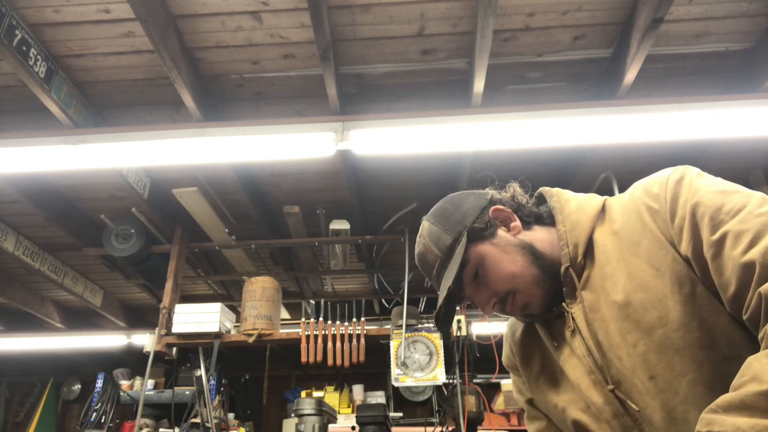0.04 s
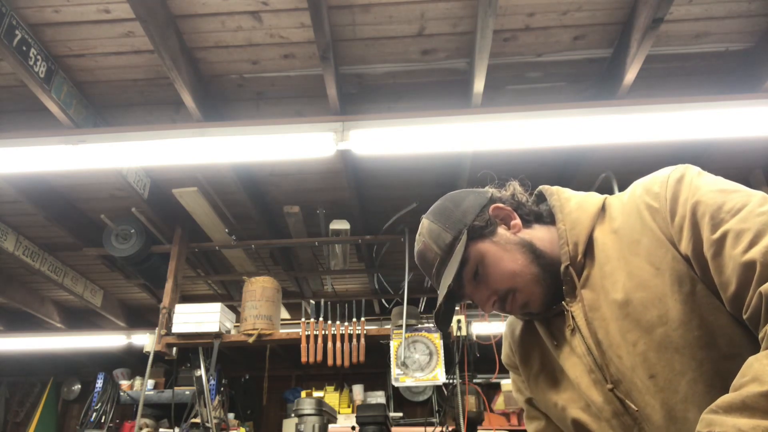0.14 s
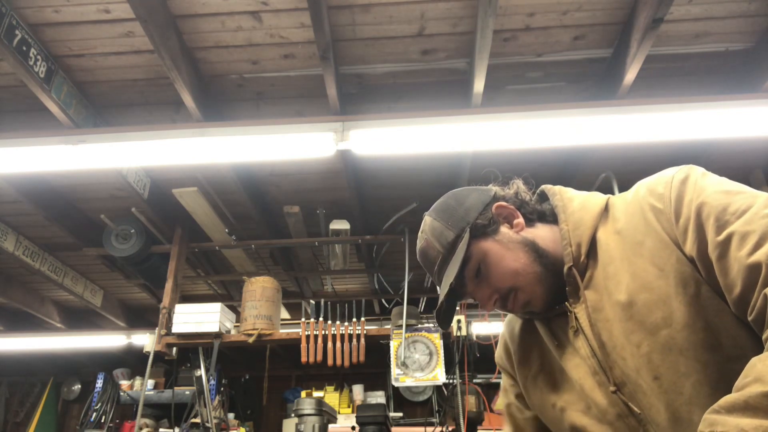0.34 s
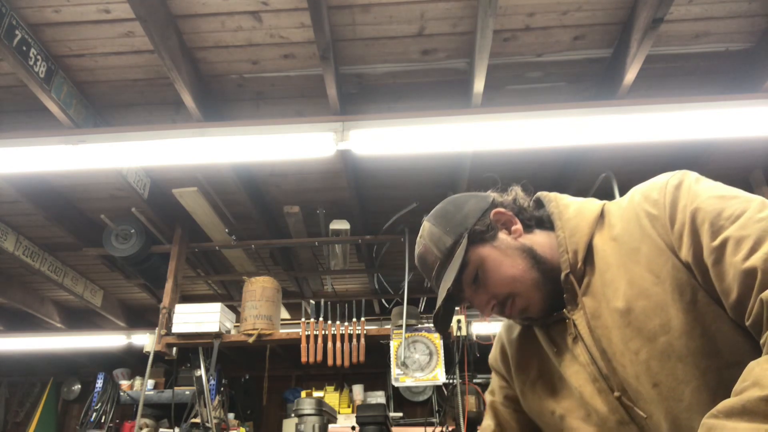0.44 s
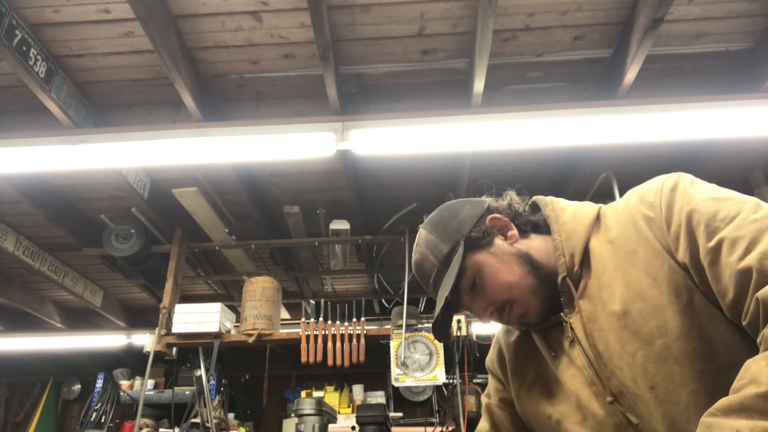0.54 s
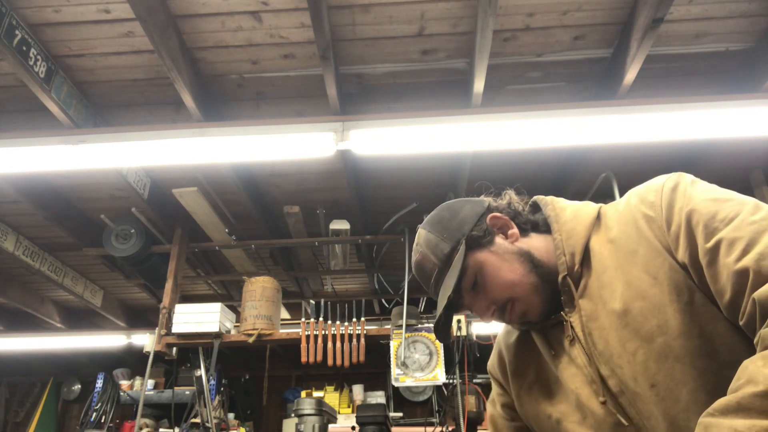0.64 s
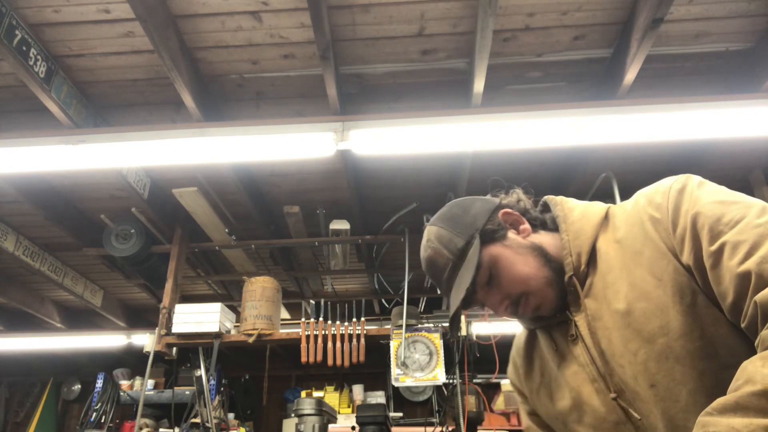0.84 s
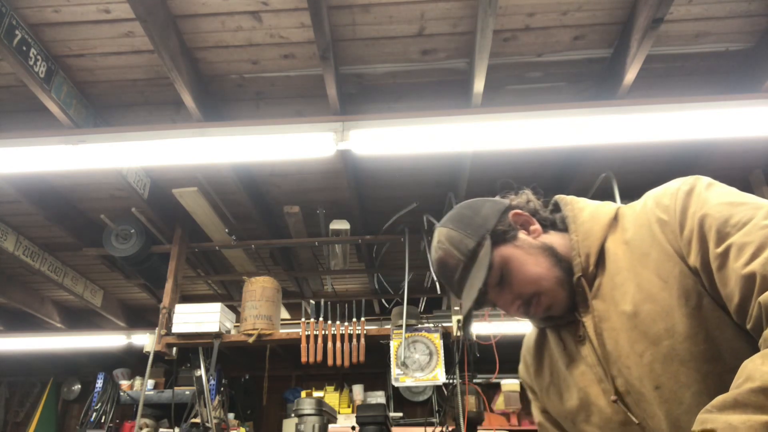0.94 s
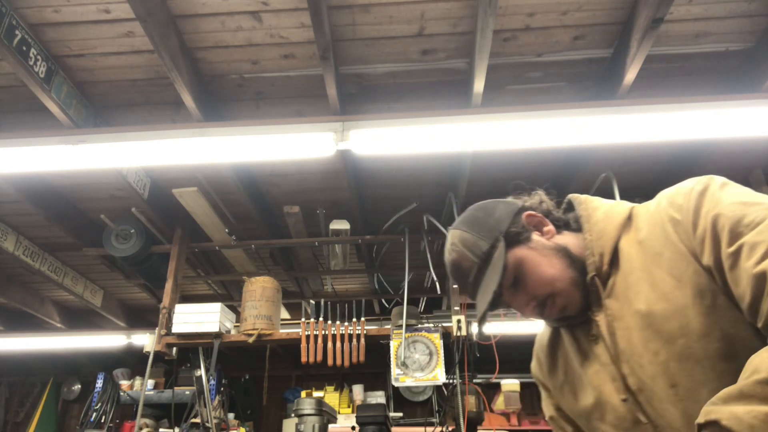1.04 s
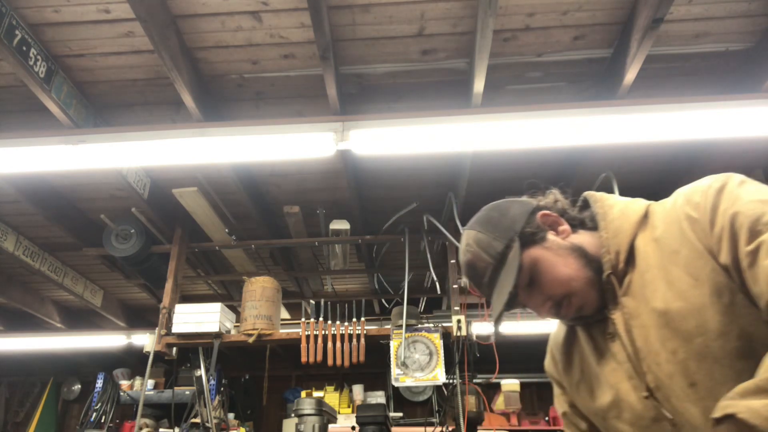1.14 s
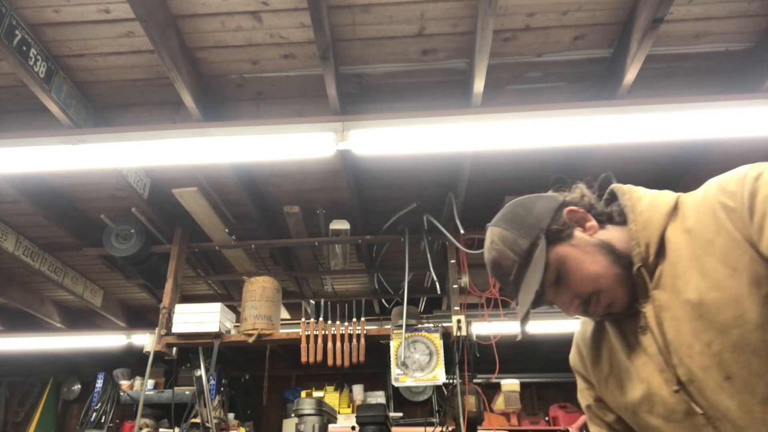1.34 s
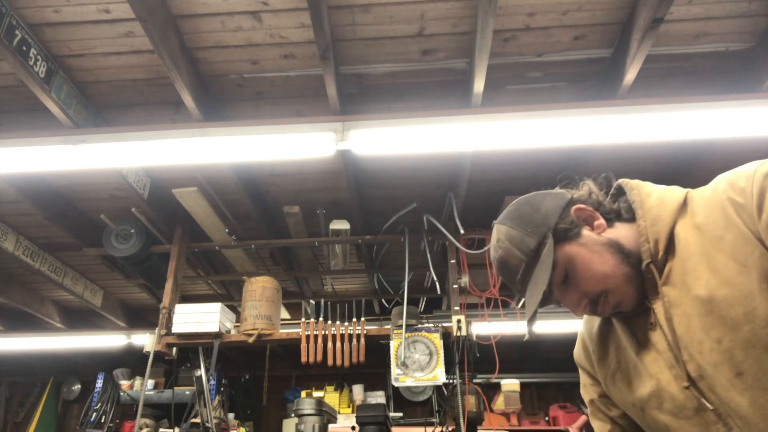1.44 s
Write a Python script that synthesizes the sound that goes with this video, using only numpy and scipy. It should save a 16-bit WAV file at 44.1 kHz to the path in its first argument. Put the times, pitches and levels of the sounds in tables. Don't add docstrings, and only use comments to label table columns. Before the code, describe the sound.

Cardboard box thumps and cracks as hands pry staples loose, then a palm brushes across it

```python
import sys
import numpy as np
from scipy import signal
from scipy.fft import rfft, irfft
from scipy.io import wavfile

SR = 44100
rng = np.random.default_rng(int(sys.argv[2]) if len(sys.argv) > 2 else 0)


def transcribe(u):
    v = np.clip(np.atleast_2d(u).T, -1, 1)
    q = np.round(v * 32767).astype(np.int16)
    wavfile.write(sys.argv[1], SR, q)


def boost(x):
    u = np.asarray(x, float) / 20
    return 10 ** u


N = 66150


def rms_one(x):
    return x / np.sqrt(np.mean(x ** 2) + 1e-20)


def at_hz(points, hz):
    point_hz, value = np.array(points)[:, 0], np.array(points)[:, 1]
    return np.interp(np.log(hz), np.log(point_hz), value)


def noise():
    return rng.standard_normal(N)


def band(x, low_hz, high_hz, order=2):
    return signal.sosfilt(signal.butter(order, [low_hz, high_hz], "band", fs=SR, output="sos"), x)


def peak_at(hz, width_hz):
    return signal.iirpeak(hz, hz / width_hz, fs=SR)


def drift(rate_hz):
    r = np.exp(-2 * np.pi * rate_hz / SR)
    wander = signal.lfilter([1], [1, -2 * r, r * r], rng.standard_normal(N + 8000))
    return rms_one(wander[8000:])


def coloured(spectrum):
    hz = np.maximum(np.arange(N // 2 + 1) * SR / N, 1)
    inside = (hz > spectrum[0][0]) & (hz < spectrum[-1][0])
    return rms_one(irfft(rfft(noise()) * boost(at_hz(spectrum, hz)) * inside, N))


def ring(clicks, hz, t60):
    r, w = boost(-60 / (t60 * SR)), 2 * np.pi * hz / SR
    return signal.lfilter([0, np.sin(w)], [1, -2 * r * np.cos(w), r * r], clicks + 1e-18)


def fall(t, t60):
    return np.exp(-np.log(1000) * t / t60)


def dying(start, t60, rise):
    t = np.maximum(np.arange(N) / SR - start, 0)
    return (1 - np.exp(-t / rise)) * fall(t, t60)


# (frequency [Hz], width [Hz], level [dB])
STRIP_MODES = [(2420, 280, -4), (4200, 1300, 0), (6580, 520, -3), (8700, 1300, -6.5), (12100, 500, -15)]


def wire(x):
    out = 0
    for k, (hz, width_hz, db) in enumerate(STRIP_MODES):
        out = out + (-1) ** k * boost(db) * rms_one(signal.lfilter(*peak_at(hz, width_hz), x))
    return rms_one(out)


# (frequency [Hz], level [dB per Hz])
AIR_SPECTRUM = [(15, -48), (25, -5), (64, 6), (122, -1), (275, -12), (1030, -26), (1240, -19),
                (2240, -29.5), (15600, -39.5)]


def air():
    return boost(-55.5) * coloured(AIR_SPECTRUM)


# (time [s], level [dB])
HAND_EFFORT = [(0, -46), (.06, -55.5), (.16, -56), (.19, -51), (0.228, -52), (0.247, -27.5), (.30, -31.5),
               (.41, -34.5), (.45, -39), (0.603, -55), (0.663, -40.5), (.72, -53.5), (.84, -66),
               (1.1, -55.5), (1.18, -55), (1.25, -48.5), (1.33, -53), (1.5, -50.5)]
# (frequency [Hz], level [dB per Hz])
RUMBLE_SPECTRUM = [(15, -26), (25, -19), (86, -8.5), (125, -5.5), (202, -5.5), (309, -10), (387, -10.5),
                   (472, -63), (600, -21.5), (780, -43), (1320, -120)]
# (frequency [Hz], level [dB per Hz])
RUSTLE_SPECTRUM = [(260, -13), (450, -10), (1080, -4), (1410, -17.5), (4210, -21), (4880, -23),
                   (6190, -31.5), (9510, -37), (15500, -46.5)]
RUMBLE_DB, RUSTLE_DB, WIRE_RUSTLE_DB = -1.5, -60.5, -72
CRACKLE_DB, CRACKLES_PER_S, CRACKLE_SPREAD_DB = -71.5, 810, 3


def handling():
    effort_db = np.interp(np.arange(N) / SR, *np.transpose(HAND_EFFORT))
    swing_db = effort_db - effort_db.mean()
    rumble = boost(effort_db + RUMBLE_DB + 0.5 * drift(33)) * coloured(RUMBLE_SPECTRUM)
    rustle = boost(RUSTLE_DB + 0.9 * swing_db + 1.7 * drift(57)) * coloured(RUSTLE_SPECTRUM)
    wire_rustle = boost(WIRE_RUSTLE_DB + 0.22 * swing_db) * wire(noise())
    strength = boost(CRACKLE_SPREAD_DB * np.minimum(rng.exponential(1, N), 4))
    grains = (rng.random(N) < CRACKLES_PER_S / SR) * strength * rng.choice([-1, 1], N)
    fibres = rms_one(band(grains + 1e-18, 533, 2220, order=4))
    crackle = boost(CRACKLE_DB + 1.1 * swing_db) * fibres
    return rumble + rustle + wire_rustle + crackle


# (time [s], peak [dB], pitch [Hz], ring
BOX_THUDS = [(0.033, -24.5, 94, 1.3), (0.177, -21.5, 215, 3.3), (0.183, -21, 115, 3.4),
             (0.2358, -12.5, 105.4, 7.8), (0.2376, -12, 355, 21.6), (0.274, -12, 185, 2.1),
             (.293, -7.5, 103, 1.3), (0.312, -45, 155, 1.6), (.302, -21, 123, 3.6),
             (0.327, -18, 148, 3.8), (0.3501, -16.5, 169, 3), (.377, -21, 293, 10), (.396, -19, 271, 5.4),
             (0.4138, -12, 117.5, 2.78), (0.46, -28, 150, 4.2), (0.534, -20.5, 138, 2.2),
             (.634, -24.5, 111.5, 5.2), (0.652, -27.5, 260, 1.9), (0.6746, -25, 170, 2.1),
             (0.6847, -19.5, 122, 3.66), (.795, -31, 243, 2.3), (0.933, -39, 74.2, 2.5),
             (1.087, -44, 283, 13), (1.205, -28, 357, 4.9), (1.211, -27.5, 80, 2.3),
             (1.247, -33, 203, 5.1), (1.2707, -33, 101, 5.7), (1.404, -24.5, 224, 1.4),
             (1.414, -18, 178, 1.19), (1.4595, -19, 112, 1.76), (1.4683, -32, 170, 1.7),
             (1.440, -33, 120, 1.7),
             (.0002, -35, 107.5, 18.4), (.001, -40, 197, 7.2), (0.2392, -13.5, 140, 4.6),
                (.405, -26, 298, 5.1), (.060, -56, 118, 1.3), (.088, -34.5, 170, 3),
                (.118, -34, 135.5, 5.5), (.198, -27.5, 199, 10.8), (0.2345, -21.5, 3700, 15.4),
                (0.2356, -14.5, 1094, 11), (.2436, -42, 3500, 14), (0.243, -14, 100, 3.8),
                (.2445, -22.5, 193, 12), (.2530, -8.5, 118, 1.2), (0.3512, -23, 360, 6.4),
                (0.24, -16.5, 252.4, 12.5), (.372, -30, 694, 16), (.5305, -38.5, 1550, 9.3),
                (.534, -34, 370, 4.1), (.537, -42, 730, 8.0), (.500, -34, 131, 2.3), (.613, -45, 110, 1.7),
                (.662, -44.5, 643, 27), (.664, -29, 255, 3.9), (.729, -39, 116, 9), (1.006, -45, 800, 3.1),
                (1.105, -42, 66.6, 4.9), (1.208, -31, 214, 5.8), (1.256, -36, 259, 10),
                (1.281, -59, 98, 3.), (1.4485, -39.5, 1280, 6.0), (1.4566, -39, 1340, 5.3),
                (1.458, -40, 523, 16), (1.456, -41, 910, 6.3)]
THUD_SOFTNESS = 1.125
CRUNCH_DB, CRUNCH_T60_S = -37, 0.043


def thuds():
    out, t = np.zeros(N + SR), np.arange(SR // 2) / SR
    paper = rms_one(band(rng.standard_normal(N + SR), 450, 1700))
    for s, db, hz, cycles in BOX_THUDS:
        i = int(s * SR)
        rise = 1 - np.exp(-t * hz * THUD_SOFTNESS * 2)
        bend = fall(t, 2 * cycles / hz) * np.sin(2 * np.pi * hz * t)
        crunch = boost(CRUNCH_DB) * fall(t, CRUNCH_T60_S) * paper[i:i + len(t)]
        out[i:i + len(t)] -= boost(db) * rise * (bend + crunch)
    return out[:N]


# (time [s], level [dB rms], bright resonance [Hz], t60 [s], board knock [dB])
WIRE_TICKS = [(0.312, -64, 8900, 0.21, -53), (0.3504, -51, 6900, 0.028, -51),
              (.361, -77.5, 9400, 0.036, -59), (0.4122, -50.5, 6000, 0.099, -33.5),
              (.520, -63, 7040, 0.043, -69), (0.5296, -54.5, 5100, 0.077, -43),
              (.631, -56.5, 5040, 0.12, -59), (0.67, -56, 4200, 0.21, -54.5),
              (.676, -62.5, 8400, 0.14, -85), (1.0063, -63, 7500, 0.025, -66),
              (.005, -61.5, 2420, 0.32, -63), (1.4498, -74, 4000, 0.023, -54)]
TICK_Q, STRIP_DB = 3.2, -4


def ticks():
    white, strip = noise(), wire(noise())
    knock = rms_one(band(noise(), 517, 1856))
    out = np.zeros(N)
    for s, db, hz, t60, knock_db in WIRE_TICKS:
        peak = signal.iirpeak(hz, TICK_Q, fs=SR)
        scratch = rms_one(signal.lfilter(*peak, signal.lfilter(*peak, white)))
        bright = scratch + boost(STRIP_DB) * strip
        out += boost(db) * bright * dying(s, t60, 0.00032)
        out += boost(knock_db) * knock * dying(s, t60 * 0.97, 0.001)
    return out


# (time [s], level [dB rms], pitch [Hz], width [Hz], t60 [s])
STAPLE_SHIVERS = [(.312, -60, 8600, 900, .1), (0.39, -52, 8400, 500, 0.034), (0.32, -52, 6500, 660, .05),
                  (.350, -63, 12400, 500, .08), (.412, -61.5, 6200, 600, 0.31),
                  (.413, -74, 14500, 700, 0.046), (.315, -69, 11700, 4500, 0.25),
                  (.676, -72, 12500, 700, .12), (.678, -66, 9800, 300, 0.16), (0.47, -65, 8100, 1100, .02),
                  (0.063, -74.5, 6700, 440, 0.69)]


def shivers():
    white, out = noise(), np.zeros(N)
    for s, db, hz, width_hz, t60 in STAPLE_SHIVERS:
        peak = peak_at(hz, width_hz)
        tremble = rms_one(signal.lfilter(*peak, signal.lfilter(*peak, white)))
        out += boost(db) * tremble * dying(s, t60, 0.0006)
    return out


# (frequency [Hz], level [dB per Hz])
CRACK_SPECTRUM = [(430, -11), (700, -9.5), (1350, -4), (1900, -12.5), (2700, -16), (4150, -25.5),
                  (4500, -28), (6000, -30), (15500, -68)]
# (time after the snap [s], level [dB])
FLAP_SLAPS = [
    (.001, -4),
    (.0045, -3.5),
    (.0095, -3.5),
    (.0205, -5.5),
    (.039, -11),
    (.052, -19),
]
# (frequency [Hz], level [dB], t60 [s])
BOARD_MODES = [(476, -16, 0.37), (588, -6, 0.105), (691.2, 3.5, 0.23), (790, -0.5, 0.16), (1063, -5, 0.21),
               (1157, -10, .14), (1227, -0.5, 0.13), (1379, -6.5, 0.19), (1433, -7, 0.17),
               (1587, -17, 0.27), (2017, -6.5, 0.043), (2250, -7.5, 0.13)]
SNAP_S, SNAP_DB, SNAP_T60_S = .2352, -18.5, 0.1
BOARD_DB, BOARD_DAMP, BOARD_LONGEST_S = -19.5, 0.97, 0.3
RESTRIKE_DB = -15
MODE_SPREAD_DB = 2.5
CONTACT_HZ = 4000


def snap():
    crack = sum(boost(db) * dying(SNAP_S + s, SNAP_T60_S * 0.25, 0.00028) for s, db in FLAP_SLAPS)
    tearing = boost(-8.5) * dying(SNAP_S, SNAP_T60_S * 2.03, 0.013)
    out = boost(SNAP_DB) * coloured(CRACK_SPECTRUM) * (crack + tearing)
    s, db = np.transpose(FLAP_SLAPS[:4])
    db[1:] += RESTRIKE_DB
    contact = signal.butter(2, CONTACT_HZ, fs=SR)
    for hz, level_db, t60 in BOARD_MODES:
        spread_db = MODE_SPREAD_DB * rng.standard_normal(len(s))
        blows = np.zeros(N)
        blows[((SNAP_S + s) * SR).astype(int)] = boost(db + level_db + BOARD_DB + spread_db)
        out += ring(signal.lfilter(*contact, blows), hz, min(BOARD_DAMP * t60, BOARD_LONGEST_S))
    return out


# (time [s], level [dB rms], t60 [s])
PAPER_CLICKS = [
    (0.413, -50, 0.035),
    (0.5305, -51, 0.015),
    (0.988, -74, .012),
    (1.0052, -45.5, 0.017),
    (1.017, -48, 0.011),
    (1.045, -56, .015),
]
CLICK_TILT = 0.9


def paper_clicks():
    dull = rms_one(signal.lfilter([1], [1, -CLICK_TILT], noise()))
    return dull * sum(boost(db) * dying(s, t60, 0.00034) for s, db, t60 in PAPER_CLICKS)


# (frequency [Hz], level [dB per Hz])
FRICTION_SPECTRUM = [(290, -56), (500, -10.5), (577, -1), (852, -5.5), (1090, -2), (3800, -5.5), (5000, -4),
                     (5780, -3), (15600, -9.5)]
SLIDE_START_S, SLIDE_END_S, SLIDE_DB = 1.1585, 1.3147, -44.5
RISE_DB_PER_S, FALL_DB_PER_S, KNEE_DB = 234, 303, 4.5
DULL_HZ, DULLING = 7950, 0.43


def slide():
    t = np.arange(N) / SR
    before = (SLIDE_START_S - t) * RISE_DB_PER_S / KNEE_DB
    after = (t - SLIDE_END_S) * FALL_DB_PER_S / KNEE_DB
    slow_db = -KNEE_DB * np.logaddexp(0, np.logaddexp(before, after))
    friction = coloured(FRICTION_SPECTRUM)
    dull = signal.filtfilt(*signal.butter(1, DULL_HZ, fs=SR), friction)
    top = boost(DULLING * slow_db) * (friction - dull)
    return boost(SLIDE_DB + slow_db + 0.89 * drift(32)) * (dull + top)


# (frequency [Hz], t60 [s])
ROOM_DECAY = [(100, 0.88), (500, 0.48), (1500, 0.67), (4000, 0.45), (12000, 0.11)]
ROOM_DB, ROOM_GAP_S = -13, 0.0026


def workshop(x):
    t, tail = np.arange(SR) / SR, 0
    edges_hz = 50 * 2 ** np.arange(0, 8.6, .5)
    for low, high in zip(edges_hz, edges_hz[1:]):
        diffuse = band(rng.standard_normal(SR), low, high)
        tail = tail + diffuse * fall(t, at_hz(ROOM_DECAY, np.sqrt(low * high)))
    tail = tail * (1 - np.exp(-t / ROOM_GAP_S))
    return boost(ROOM_DB) * signal.fftconvolve(x, tail / np.sqrt(np.sum(tail ** 2)))[:N]


def scene():
    low = thuds()
    bright = ticks() + shivers() + snap() + paper_clicks() + slide()
    tail = workshop(bright + boost(-6.5) * low)
    return (low + bright + tail + handling() + air())[None]


def roll_off(x):
    return signal.sosfilt(signal.butter(12, 15740, fs=SR, output="sos"), x)


# (frequency [Hz], width [Hz], depth [dB])
HOUSING_DIPS = [(4865, 410, 7), (10400, 390, 9)]
LOW_CUT_HZ, TOP_CUT_HZ, CEILING = 36, 16050, .9


def record(dry):
    x = signal.sosfilt(signal.butter(2, LOW_CUT_HZ, "high", fs=SR, output="sos"), dry)
    for hz, width_hz, depth_db in HOUSING_DIPS:
        x = x - (1 - boost(-depth_db)) * signal.lfilter(*peak_at(hz, width_hz), x)
    rounded = CEILING * np.tanh(x / CEILING)
    mix = signal.sosfilt(signal.cheby2(10, 50, TOP_CUT_HZ + 250, fs=SR, output="sos"), rounded)
    return roll_off(mix)


dry = scene()
out = record(dry)
transcribe(out)
```